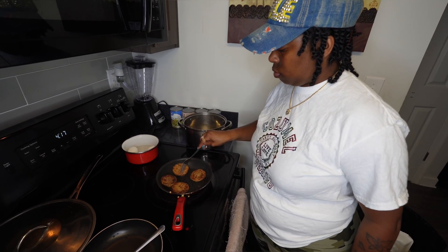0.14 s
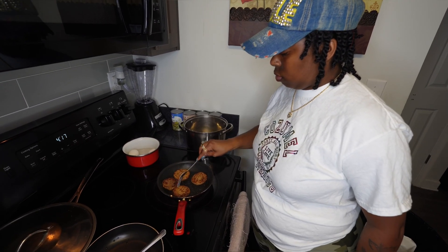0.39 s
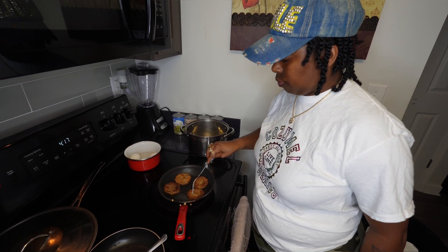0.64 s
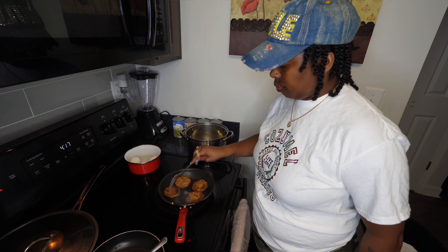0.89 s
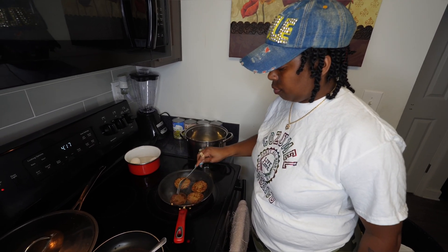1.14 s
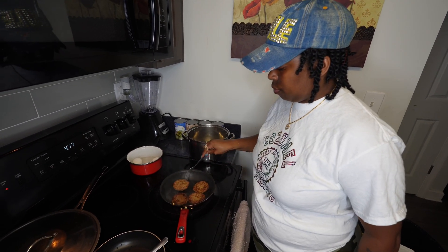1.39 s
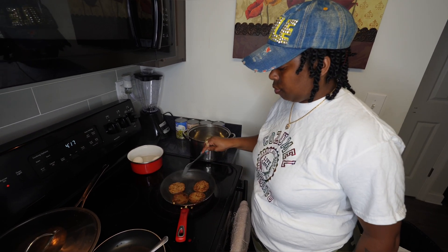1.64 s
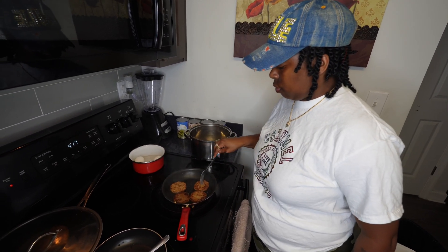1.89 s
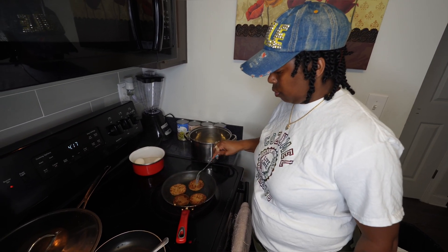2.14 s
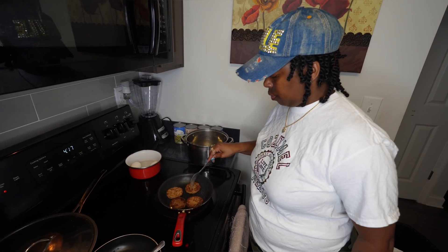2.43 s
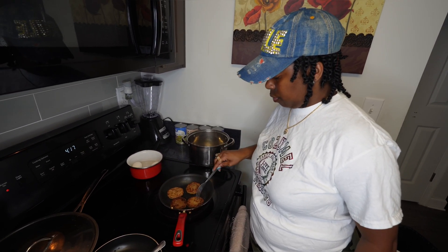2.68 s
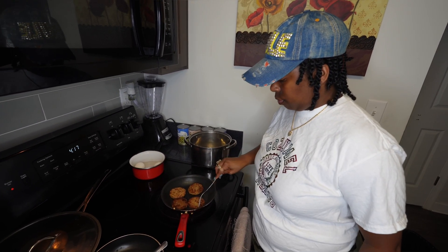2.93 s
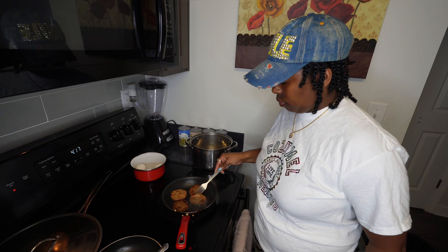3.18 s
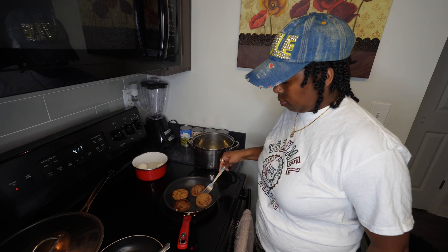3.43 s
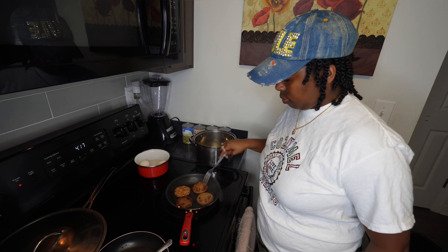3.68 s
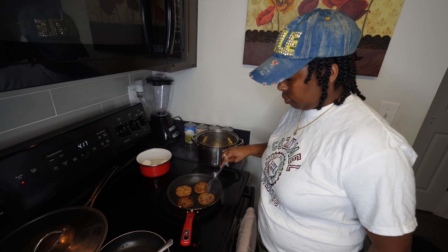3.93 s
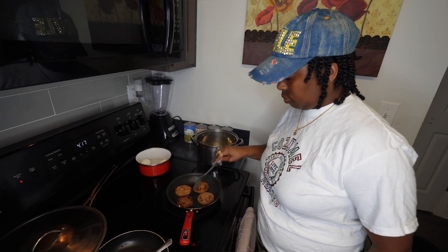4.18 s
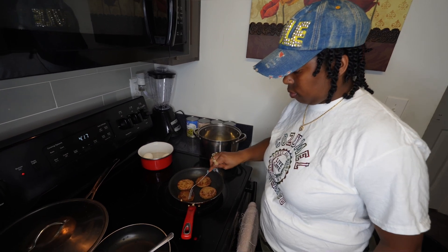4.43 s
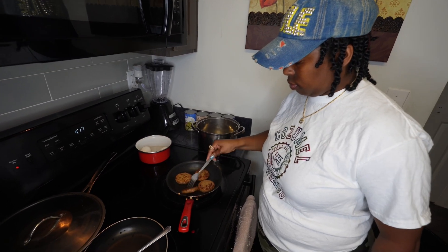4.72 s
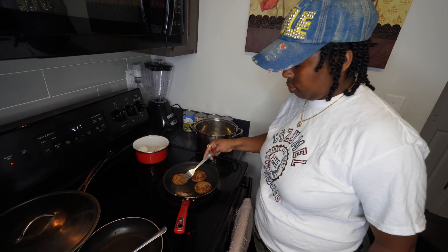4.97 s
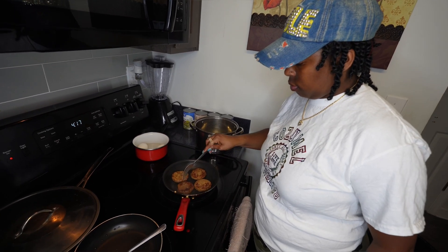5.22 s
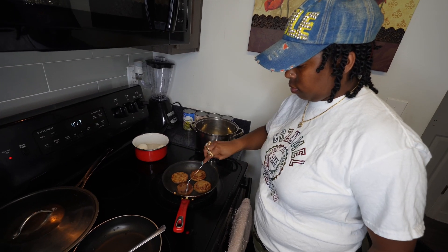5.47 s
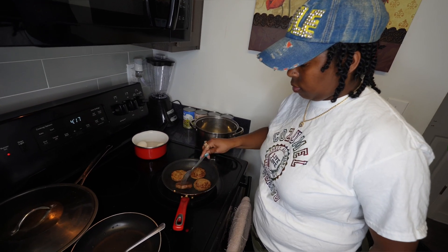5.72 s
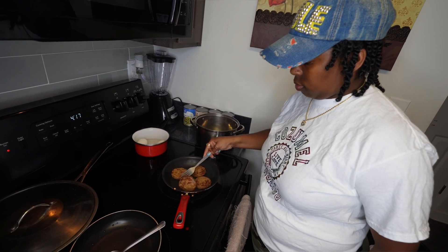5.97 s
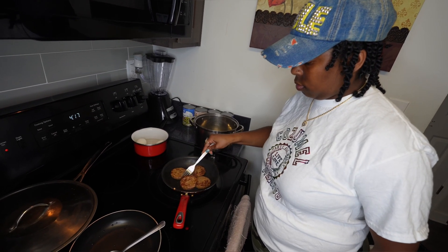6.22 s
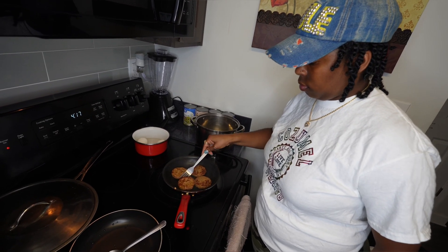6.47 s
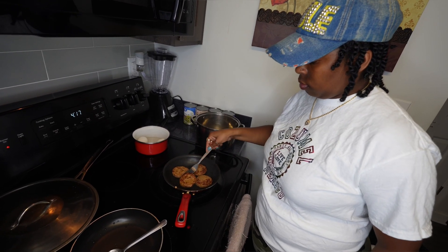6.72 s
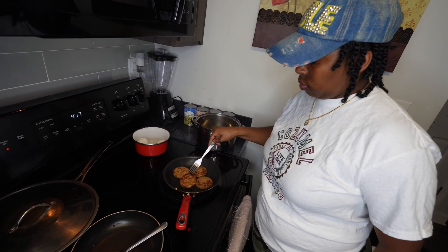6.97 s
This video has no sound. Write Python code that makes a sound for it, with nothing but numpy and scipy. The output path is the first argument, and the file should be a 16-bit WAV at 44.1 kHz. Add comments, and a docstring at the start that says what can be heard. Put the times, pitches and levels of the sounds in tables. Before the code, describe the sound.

For about seven seconds, patties sizzle in hot fat in a metal frying pan, heard close in stereo in a small hard-walled kitchen with short bright echoes. The hiss is dense and crisp, made of countless tiny bubbles, opening strong with a cluster of snapping spits in the first 0.4 seconds. It swells near 0.7 and 2.2 seconds, with sharp pops around 0.9 to 1.3. Light fork clicks come at 1.2 and 1.4. At 3.5 the fork rattles quickly on the pan, its tines ringing high and briefly; more taps follow at 3.7, 4.0, 4.2 and 4.7. A very faint soft thud sags at 5.1. The sizzle is thinner now but flares at 5.8, as fork taps resume, with a firm double click at 6.4 and fainter ones to 6.9, amid small crackles. A quiet, smooth low hum lies beneath throughout.

```python
"""Sausage patties sizzle in a steel frying pan: thousands of bubbles ring briefly, and larger spits crack.
Boiling strength and flares of juice in hot fat shape the sizzle; each spit sputters on at one pitch.
A fork taps the pan now and then, once with a rattle, by clicks, damped pan modes and singing tines.
One soft bump on the stove is a sagging tone. A hard-walled kitchen adds short echo tails and an echo
from over the stove; smooth low noise hums behind it all, on two microphones."""
import sys
import numpy as np
from scipy import signal
from scipy.fft import rfft, irfft, next_fast_len
from scipy.io import wavfile
from scipy.ndimage import uniform_filter1d

SR = 44100
rng = np.random.default_rng(int(sys.argv[2]) if len(sys.argv) > 2 else 0)


def digitize_waveform(pressure):
    """Quantize a signal to 16-bit integers and store it at the path in sys.argv[1].

    Rows of a 2-D input are taken as channels; values are limited to [-1, 1].
    """
    field = np.atleast_2d(pressure).T
    bounded = np.clip(field, -1, 1)
    quanta = np.round(bounded * 32767).astype(np.int16)
    wavfile.write(sys.argv[1], SR, quanta)


def makeup_ratio(level_db):
    """Linear amplitude ratio for a level in decibels (20 dB per factor of ten)."""
    decades = np.asarray(level_db, float) / 20
    return 10 ** decades


N = 313992  # samples, 7.12 s


def evened(x):
    """Scales a signal to unit rms."""
    return x / np.sqrt(np.mean(x ** 2) + 1e-20)


def read(points, hz):
    """Reads a curve of (Hz, value) points along a logarithmic pitch axis."""
    f, value = np.transpose(points)
    return np.interp(np.log(hz + 1), np.log(f + 1), value)


def coloured(x, points):
    """Filters by a gain curve of (Hz, dB) points."""
    size = next_fast_len(len(x))
    gain = makeup_ratio(read(points, np.fft.rfftfreq(size, 1 / SR)))
    return irfft(rfft(x, size) * gain, size)[:len(x)]


def without_bass(x, hz):
    """Small sources radiate little bass: a second-order high-pass."""
    return signal.sosfilt(signal.butter(2, hz, "high", fs=SR, output="sos"), x)


def add(mix, s, sound):
    """Lays a sound into the mix from second s, cut at the end."""
    part = mix[round(s * SR):][:len(sound)]
    part += sound[:len(part)]


def ring(hz, t60, size=8000):
    """A damped mode: a sine that loses 60 dB in t60 seconds."""
    t = np.arange(size) / SR
    return np.sin(2 * np.pi * hz * t) * makeup_ratio(-60 * t / t60)


def wander(per_s):
    """Slow random drift of unit rms, from noise averaged twice over 1 / per_s seconds."""
    span = round(SR / per_s)
    noise = rng.standard_normal(N)
    return evened(uniform_filter1d(uniform_filter1d(noise, span), span))


# Colour of the sizzle over the pan. Each row: pitch in Hz, filter gain in dB.
SIZZLE_COLOUR = [(240, -60), (400, -45), (490, -26.5), (581, -38), (913, -22.5), (1250, -19), (1460, -11),
                 (1930, -8), (3220, -0.5), (3650, -2.5), (8060, -3.5), (15800, -12), (16500, -105)]
# How hard the fat boils. Each row: time in seconds, vigour in dB, small bubbles over large ones in dB.
BOIL = [(0.0, -25, 0), (0.3, -28.5, 1.5), (0.52, -27.5, -0.5), (0.716, -22, -.5), (1.07, -26, 1.5),
        (1.37, -30, 4.5), (1.9, -29.5, 3), (2.22, -24.5, -1.5), (2.57, -27, 1), (2.78, -28.5, -1.5),
        (2.96, -25, 3), (3.45, -26.5, .5), (3.7, -30, 1.5), (4.1, -29.5, 1), (4.36, -32, 0.5),
        (4.9, -28, 0.5), (5.13, -27, 1.5), (5.5, -30.5, 2.5), (5.95, -32.5, 4.5), (7.12, -31.5, 2)]


def sizzle():
    """Bubbles of every size burst in clumps; each size rings a few cycles at its own pitch."""
    t, out = np.arange(N) / SR, np.zeros(N)
    surge = wander(76)
    s, vigour_db, bright_db = np.transpose(BOIL)
    large_flare_db, small_flare_db = flares(t)
    large_db = large_flare_db + np.interp(t, s, vigour_db)
    small_db = small_flare_db + np.interp(t, s, vigour_db + bright_db)
    # one bubble size stands out at first, while the meat is wet
    common_hz, spread_octaves = 3100, 0.19
    common_db = 3.5 - 0.86 * t
    for hz in np.geomspace(500, 16000, num=22):
        small = np.clip(np.log2(hz / 3800) / 0.54, 0, 1)
        common = np.exp(-(np.log2(hz / common_hz) / spread_octaves) ** 2)
        level_db = (1 - small) * large_db + small * small_db + common * common_db
        # all sizes surge together, and each has its own clumps
        clump_db = 1.05 * surge + 1.05 * wander(50)
        # bursts are rare and a few are strong, more so among the smallest bubbles
        burst_here = rng.random(N) < hz * .12 / SR
        scatter_db = 2.5 + .4 * (hz > 11000)
        bursts = burst_here * makeup_ratio(scatter_db * np.minimum(rng.exponential(1, N), 5))
        bubble = ring(hz, 7.2 / hz, size=800)
        ringing = evened(signal.oaconvolve(bursts, bubble)[:N])
        out += np.sqrt(hz) * ringing * makeup_ratio(level_db + clump_db)
    return makeup_ratio(-43.0) * coloured(out, SIZZLE_COLOUR)


# Juice meets hot fat and flares up. Each row: peak time in seconds, swell of the large bubbles in dB,
# swell of the small bubbles in dB; a negative swell is a dip.
FLARES = [(0.06, 0.5, 0.5), (0.398, 1, 2), (1.238, 3.5, 3.5), (1.533, 3, 1.5), (1.627, 5, 0.5),
          (1.964, 0.5, 0.5), (2.656, 2, 1.5), (2.998, 3, 1.5), (3.148, 2, -2.5), (3.532, 1, 1.5),
          (4.0, 2.5, 0.5), (4.189, 4, 0.5), (4.428, 4.5, 3), (4.581, 3, 3.5), (4.74, 4.5, 1),
          (4.958, -1.5, 3.5), (5.132, 1.5, 3.5), (5.77, 7.5, 5.5), (6.028, 3, -0.5), (6.093, -0.5, 0),
          (6.273, 4.5, -0.5), (6.338, 3.5, 0), (6.518, 2, 0.5), (6.641, 4, 1.5), (6.907, 2.5, 2)]


def flares(t):
    """Swell in dB of large and small bubbles: every flare rises fast and dies a little slower."""
    rise_s, fall_s = .03, .042
    s, large_db, small_db = np.transpose(FLARES)
    late = t - s[:, None]
    shape = np.exp(-(late / np.where(late < 0, rise_s, fall_s)) ** 2)
    return large_db @ shape, small_db @ shape


# Spits of fat. Each row: start in seconds, level of the first burst in dB before the bass cut, bubble pitch in Hz.
SPITS = [(0.0646, -5, 4470), (0.1712, -5, 2910), (0.2259, -8, 4270), (0.2811, -4, 2840), (0.3613, -7, 6790),
         (0.4199, -7, 3010), (0.9159, -6, 5860), (0.9498, -1, 5390), (0.982, -6, 11500), (0.9886, -7, 8170),
         (1.054, -5, 4720), (1.1332, -4, 4910), (1.281, -4, 4550), (1.8298, -5, 12000), (1.9305, -6, 5760),
         (2.0684, -8, 4620), (2.2796, -4, 11000), (2.2843, -4, 10500), (2.4255, -7, 3190),
         (2.5304, -9, 5060), (2.6256, -6, 3290), (2.6769, -6, 4080), (2.694, -10, 3200), (3.2294, -3, 6340),
         (3.3108, -4, 4240), (3.449, -6, 4000), (3.7326, -10, 6310), (3.8065, -10, 5290),
         (3.9834, -6, 6790), (4.0782, -10, 5180), (4.1235, -7, 10000), (4.1252, -8, 3540),
         (4.128, -10, 9000), (4.1514, -7, 3900), (4.1908, -9, 4900), (4.6696, -11, 3750),
         (4.8568, -10, 5190), (5.0257, -8, 5100), (5.1238, -7, 8500), (5.5321, -8, 2920),
         (5.9207, -8, 2890), (6.0146, -8, 4880), (6.0713, -8, 3640), (6.3236, -8, 5690), (6.328, -6, 12500),
         (6.3285, -8, 5200), (6.3928, -8, 2610), (6.5167, -9, 4810), (6.5595, -11, 9000),
         (6.5939, -9, 5560), (6.6084, -8, 8500), (6.7314, -11, 6630), (6.9938, -11, 3160)]


def spits():
    """A steam pocket bursts with a crack, then sputters in smaller bursts at the same pitch."""
    out, t = np.zeros(N), np.arange(3000) / SR
    chance = rng.standard_normal((len(SPITS), 2, len(t)))
    for (s, db, hz), (pick, size) in zip(SPITS, chance):
        train = 0.31 * size * (pick > 1.8) * np.exp(-t / .004)
        train[0] = 1
        swell = np.minimum(np.arange(600) * hz / SR, 1)  # over one cycle
        bubble = ring(hz, 5.9 / hz, size=600) * swell
        bubble[:3] += 0.0093 * np.array([-1, 2, -1])  # the film tears
        add(out, s, makeup_ratio(db) * signal.fftconvolve(train, bubble / abs(bubble).max()))
    return without_bass(out, 2240)


# Fork on pan. Each row: start in seconds, level in dB of click and ring together, pitch of the contact
# in Hz, weight of the ring beside the click, level of the low ring of the pan in dB.
TAPS = [(1.1997, -8, 4500, 0.36, -32.5), (1.407, -13, 3560, 0.63, -30.5), (3.514, -4.5, 2620, 0.48, -15),
        (3.5173, -7, 5160, 0.55, -18.5), (3.523, -12.5, 2430, 0.7, -46), (3.5312, -12, 4750, .5, -19.5),
        (3.5342, -13.5, 2400, 0.97, -26), (3.554, -14, 2470, 0.32, -28.5), (3.6877, -2.5, 2860, 0.27, -38),
        (3.9765, -7.5, 2680, .5, -39), (3.9808, -25, 2420, 0.34, -43), (4.1834, -4.5, 4600, 0.61, -35),
        (4.7289, -12.5, 2800, 0.66, -33.5), (5.307, -21, 2400, 0.45, -31), (5.317, -15, 3000, 0.33, -31.5),
        (5.754, -12, 2220, 0.36, -48), (5.8353, -2, 4040, 0.26, -33.5), (5.836, -9, 2180, 0.32, -59),
        (5.916, -12, 2260, 0.29, -33.5), (6.071, -12.5, 2300, 0.26, -38.5), (6.270, -9, 2770, 0.24, -33.5),
        (6.3832, -2, 2680, 0.58, -29.5), (6.386, -5, 4050, 0.59, -47), (6.5354, -9.5, 2170, 0.18, -44),
        (6.886, -20, 2400, .3, -38)]
# Modes of the pan with food in it. Each row: pitch in Hz, level in dB before the spot changes it, t60 in seconds.
PAN_MODES = [(180, -16, .05), (280, -16, .04), (465, -11, .05), (630, -10, .04), (750, -6, .045),
             (890, -6, .04), (970, -3, .045), (1075, -4, .05), (1170, -6, .04), (1490, -6, .035),
             (1620, -5, .045), (2020, -5, .04), (2240, -6, .03), (2466, -5, .07), (2740, -5, .04),
             (3090, -4, .03), (3300, -6, .035), (3760, -6, .03), (4370, -6, .03), (4700, -5, .04),
             (5300, -5, .03), (5900, -8, .03)]
# Taps that set the tines singing. Each row: start in seconds, level in dB.
TWANGS = [(3.514, -24), (3.524, -13), (3.5308, -15), (3.982, -18.5), (3.991, -28)]


def fork():
    """A tap clicks, rings the pan modes near the pitch of the contact and the pan's body; some ring the tines."""
    out, t = np.zeros(N), np.arange(8000) / SR
    spot_db = 2 * rng.standard_normal((len(TAPS), len(PAN_MODES)))  # another spot on the pan every time
    pitch_hz, level_db, t60 = np.transpose(PAN_MODES)
    modes = np.array([ring(*mode) for mode in zip(pitch_hz, t60)])
    for (s, db, centre_hz, share, body_db), spot in zip(TAPS, spot_db):
        soft = np.minimum(t * centre_hz, 1)  # contact lasts one cycle
        distance_db = 18 * np.log2(pitch_hz / centre_hz) ** 2
        near = makeup_ratio(level_db + spot - distance_db) @ modes * soft
        click = ring(centre_hz, 13 / centre_hz) * soft
        low_modes = makeup_ratio(level_db + spot) * (pitch_hz < 1300)
        body = low_modes @ modes * np.minimum(t / .0015, 1)
        contact = 1.3 * click + share * near / abs(near).max()
        add(out, s, makeup_ratio(db) * without_bass(contact, 1100))
        add(out, s, makeup_ratio(body_db) * body / abs(body).max())
    tines_hz, tines_t60 = 7574, .08
    for s, db in TWANGS:
        add(out, s, makeup_ratio(db) * ring(tines_hz, tines_t60))
    return without_bass(out, 200)


def thud():
    """Something soft bumps the stove; its pitch sags as it dies."""
    out, t = np.zeros(N), np.arange(8000) / SR
    start_s, level_db, start_hz, t60 = 5.121, -35, 175, 0.09
    cycles = start_hz * t * (1 - 1.5 * t)  # the pitch falls by 3 times start_hz per second
    bump = np.sin(2 * np.pi * cycles) * makeup_ratio(level_db - 60 * t / t60)
    add(out, start_s, bump * np.minimum(t / 0.0038, 1))
    return out


def hood(x):
    """One strong echo from the hard surface over the stove; its delay wanders as the spot in the pan does."""
    delay_s, level_db = .0045, -5
    late = delay_s * SR * (1 + .05 * wander(30))
    return makeup_ratio(level_db) * np.interp(np.arange(N) - np.round(late), np.arange(N), x)


# How long the kitchen rings. Each row: pitch in Hz, t60 in seconds.
KITCHEN = [(250, 0.91), (1000, 0.3), (3000, 0.33), (8000, 0.26), (15000, 0.43)]


def tails():
    """Two unrelated echo tails: sparse taps of random sign, each band dying at its own speed."""
    taps = np.zeros((2, SR // 2))
    starts = np.arange(60, SR // 2 - 20, 20)
    at = starts + rng.integers(0, 20, (2, len(starts)))
    np.put_along_axis(taps, at, rng.choice([-1., 1.], at.shape), 1)
    hz, t, z = signal.stft(taps, SR, nperseg=256)
    t60 = np.maximum(read(KITCHEN, hz), .03)[:, None]
    tail = signal.istft(z * makeup_ratio(-60 * t / t60), SR, nperseg=256)[1]
    return tail / np.linalg.norm(tail, axis=1, keepdims=True)


def echoes(x):
    """Bursts come from ever-changing spots, so the sound passes four pairs of tails in turn."""
    turn = np.arange(N) / SR / .12 % 1  # one round takes 0.12 s
    out = np.zeros((2, N))
    for k in range(4):
        off = (turn - k / 4 + .5) % 1 - .5
        share = np.cos(2 * np.pi * np.clip(off, -.25, .25))  # neighbours crossfade
        out += signal.fftconvolve((x * share)[None], tails(), axes=1)[:, :N]
    return out


# Colour of the hum in the room. Each row: pitch in Hz, relative level in dB per Hz.
HUM_COLOUR = [(12, -42), (20, -9.5), (168, 2.5), (375, -0.5), (479, -3), (583, -4), (822, -2.5),
              (1000, 2.5), (1300, -23), (2200, -120)]


def hum():
    """Appliances and house rumble: smooth low noise at unit rms."""
    return evened(coloured(rng.standard_normal(N), HUM_COLOUR))


# Difference between the two microphones. Each row: pitch in Hz, gain of the side signal in dB.
WIDTH = [(60, -21), (110, -21), (200, -16.5), (380, -15.5), (700, -18.5), (1290, -22.5), (2380, -23.5),
         (4400, -12.5), (8120, -3.5), (15000, -4)]


def scene():
    """Direct sound plus echoes; the two microphones differ mostly by the echoes, more so in the treble."""
    hum_gain = makeup_ratio(-57)
    pan = sizzle() + spits() + fork()
    common, unlike = echoes(pan)
    mid = pan + hood(pan) + makeup_ratio(-3.5) * common + hum_gain * hum() + thud()
    off_centre = 0.054 * np.roll(pan, 2)  # a little direct sound, two samples late
    side = makeup_ratio(2.0) * without_bass(unlike, 390) + off_centre + 2.7 * hum_gain * hum()
    side = coloured(side, WIDTH)
    balance_db = np.array([[.22], [-.22]])
    return np.array([mid + side, mid - side]) * makeup_ratio(balance_db)


def top_cut(x):
    """Nothing passes above the cut-off."""
    return signal.sosfilt(signal.butter(12, 16970, fs=SR, output="sos"), x)


def record(dry):
    """Delivers the finished mix of both microphones."""
    return top_cut(dry)


dry = scene()
out = record(dry)
digitize_waveform(out)
```